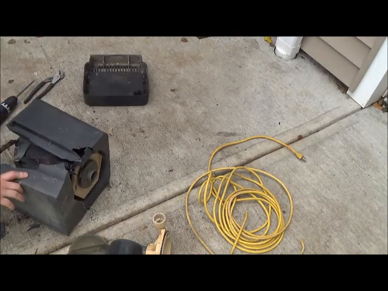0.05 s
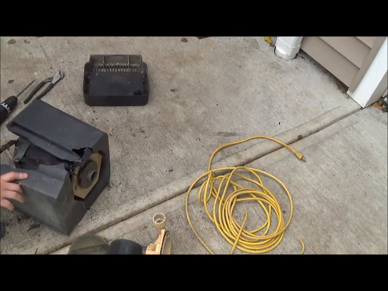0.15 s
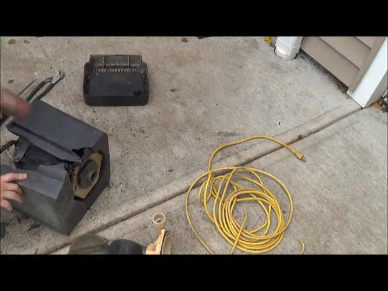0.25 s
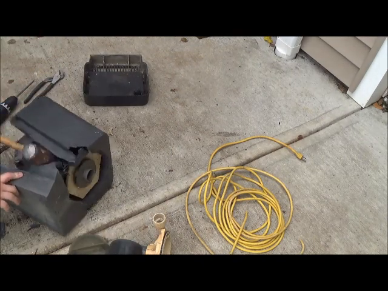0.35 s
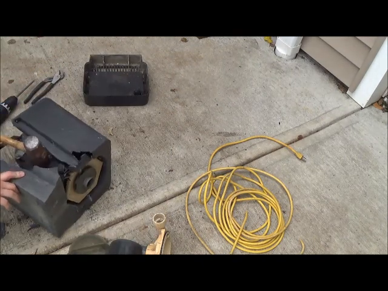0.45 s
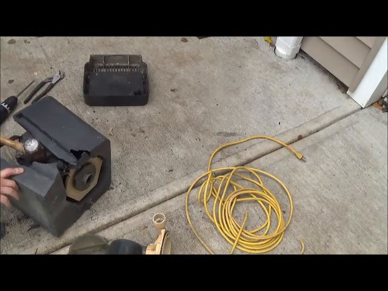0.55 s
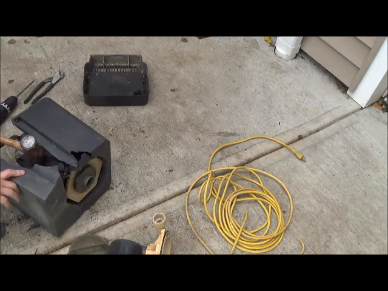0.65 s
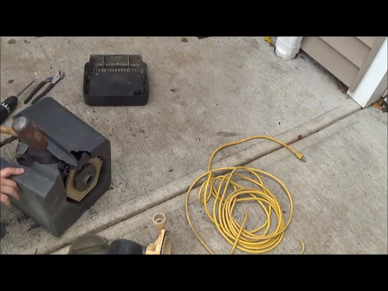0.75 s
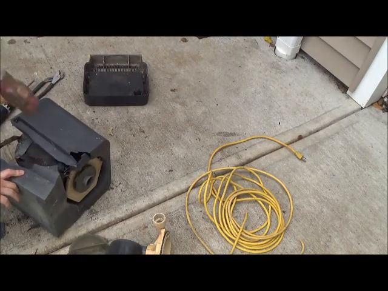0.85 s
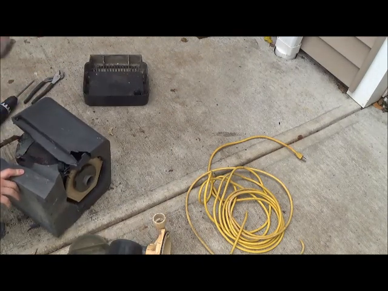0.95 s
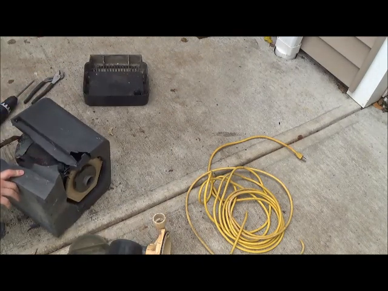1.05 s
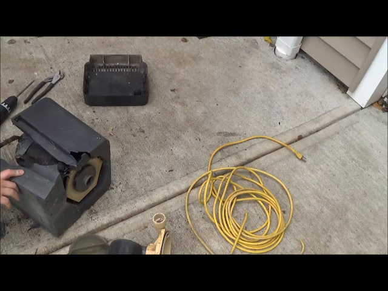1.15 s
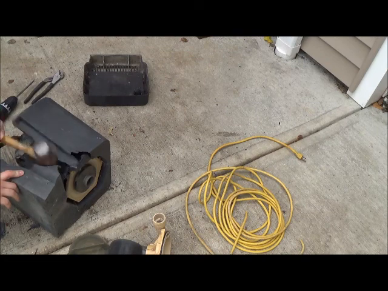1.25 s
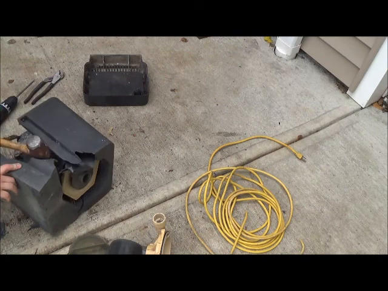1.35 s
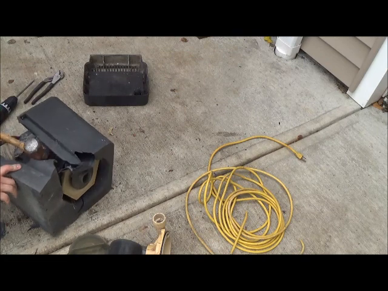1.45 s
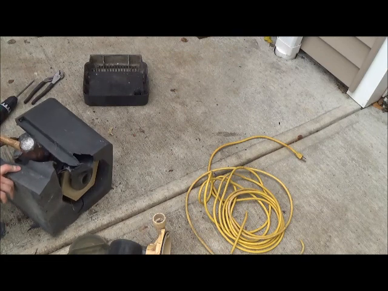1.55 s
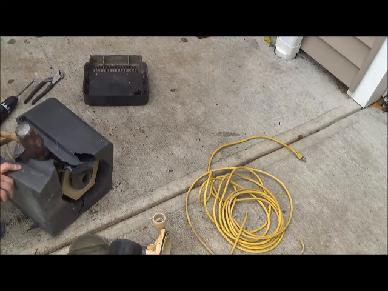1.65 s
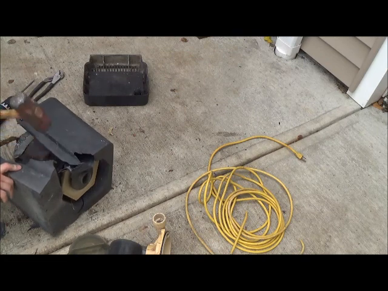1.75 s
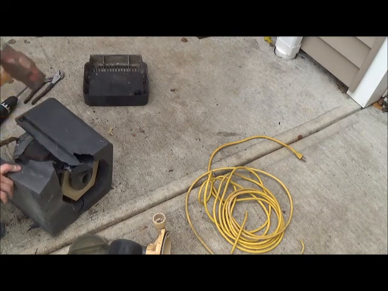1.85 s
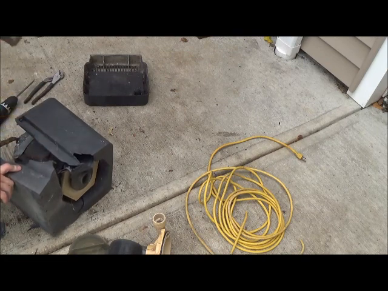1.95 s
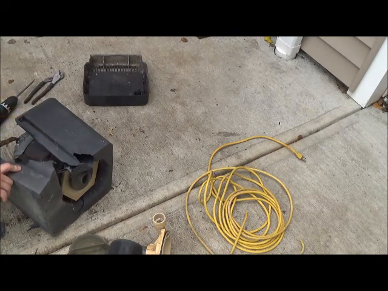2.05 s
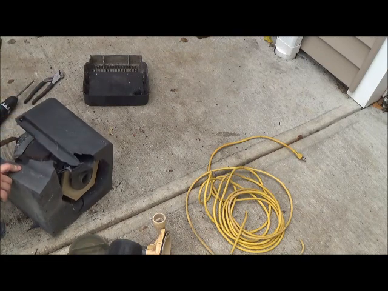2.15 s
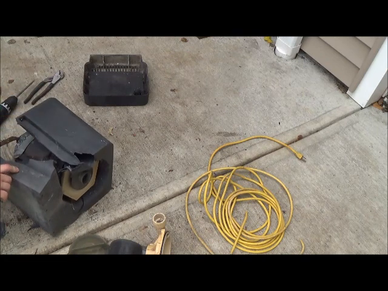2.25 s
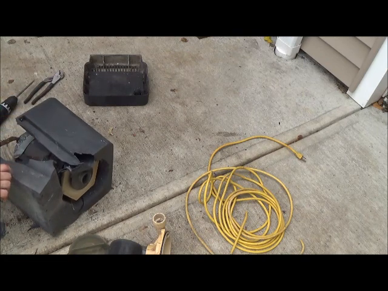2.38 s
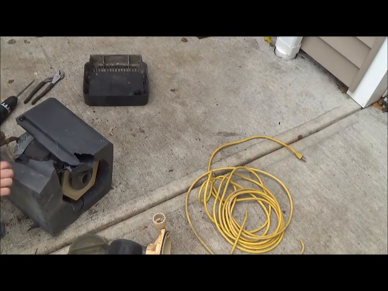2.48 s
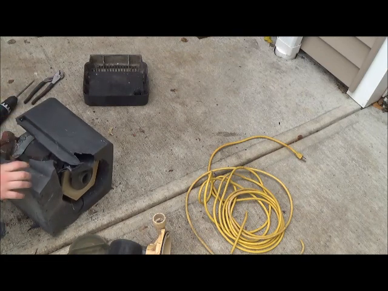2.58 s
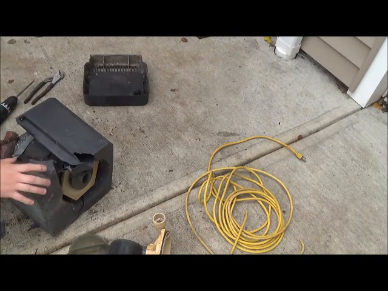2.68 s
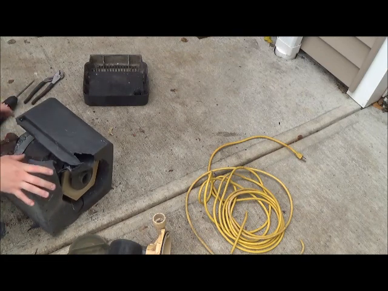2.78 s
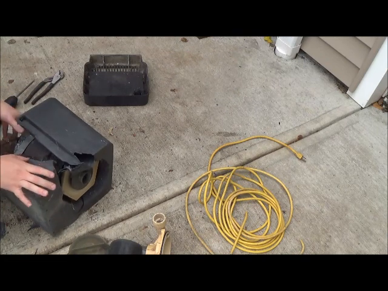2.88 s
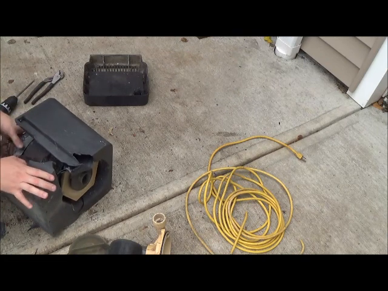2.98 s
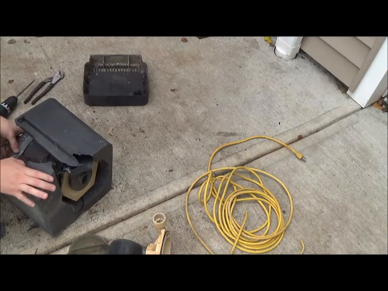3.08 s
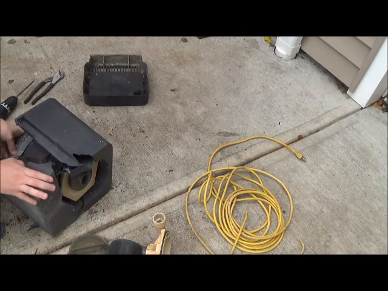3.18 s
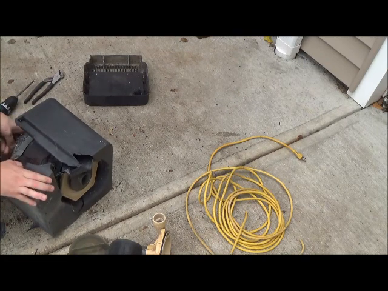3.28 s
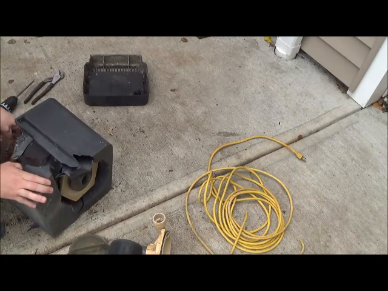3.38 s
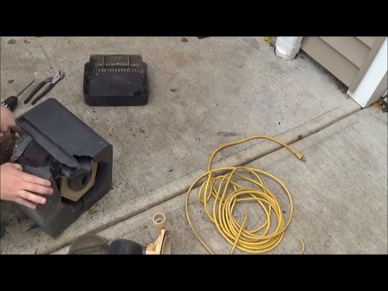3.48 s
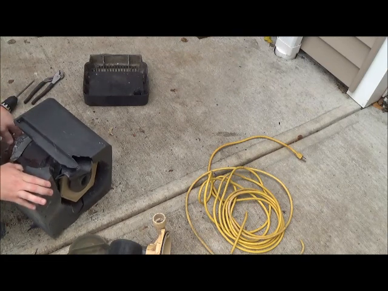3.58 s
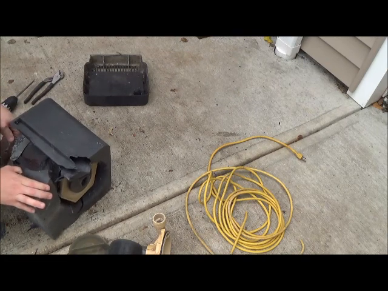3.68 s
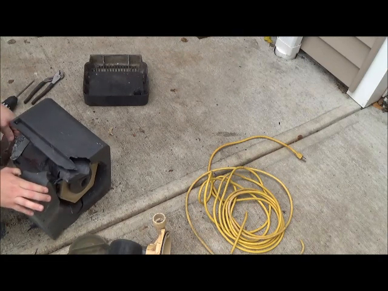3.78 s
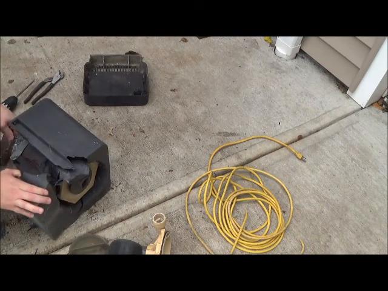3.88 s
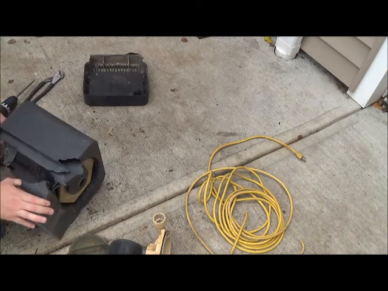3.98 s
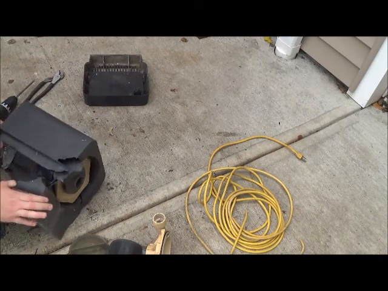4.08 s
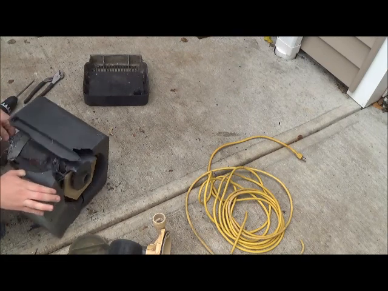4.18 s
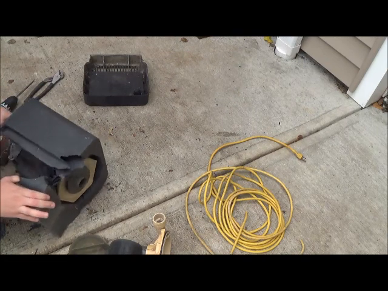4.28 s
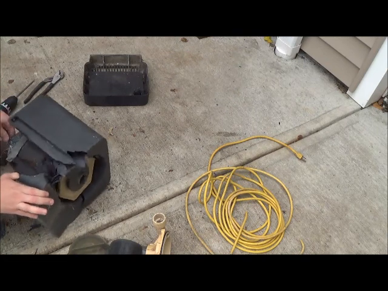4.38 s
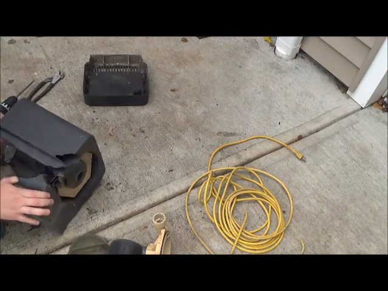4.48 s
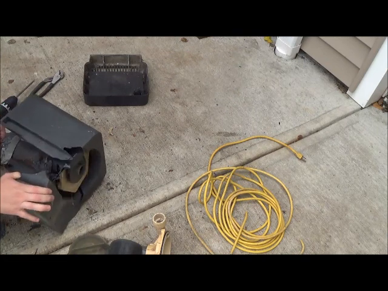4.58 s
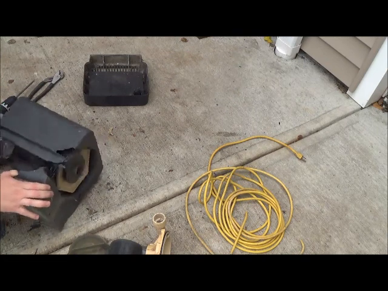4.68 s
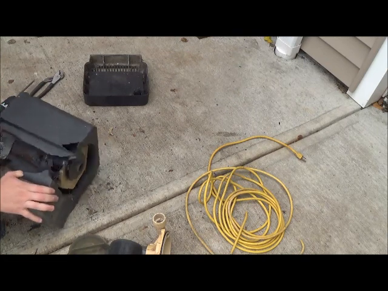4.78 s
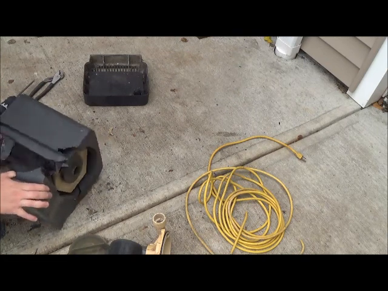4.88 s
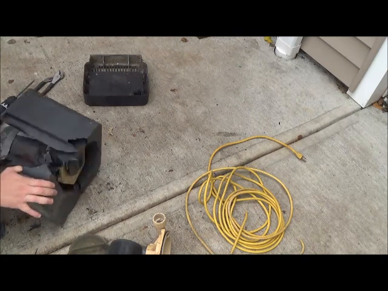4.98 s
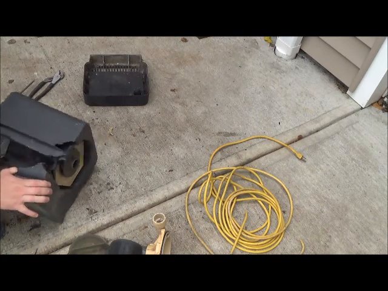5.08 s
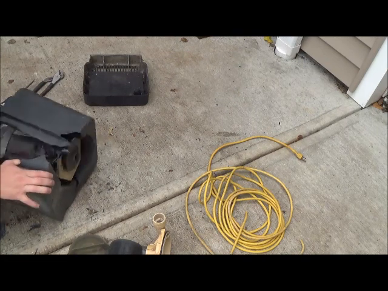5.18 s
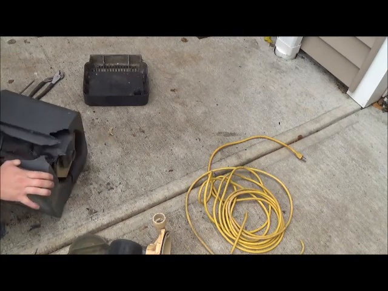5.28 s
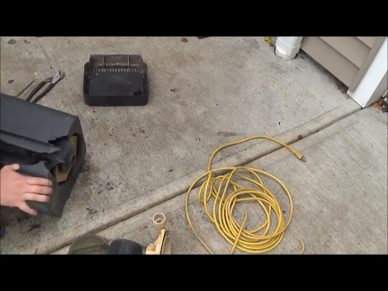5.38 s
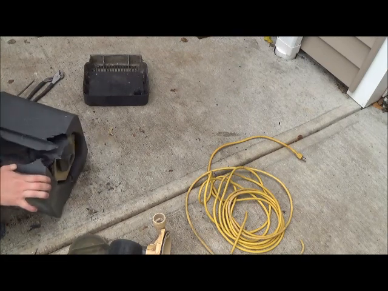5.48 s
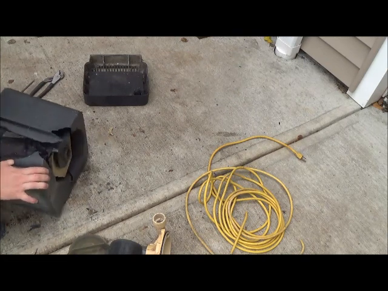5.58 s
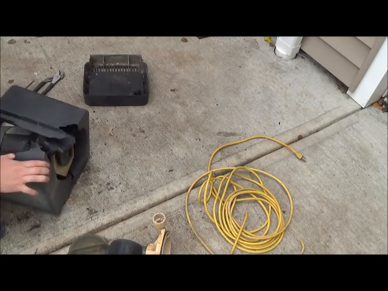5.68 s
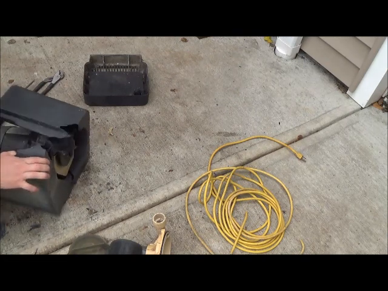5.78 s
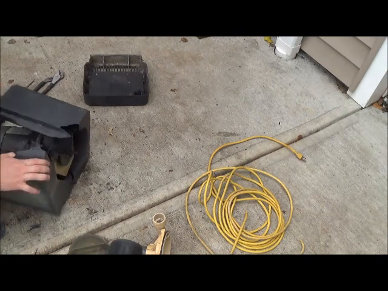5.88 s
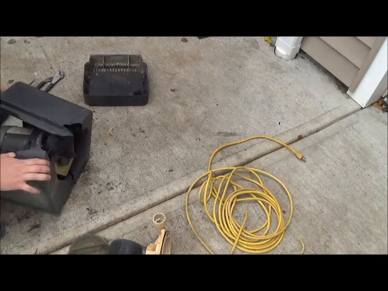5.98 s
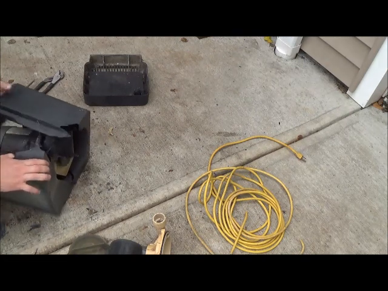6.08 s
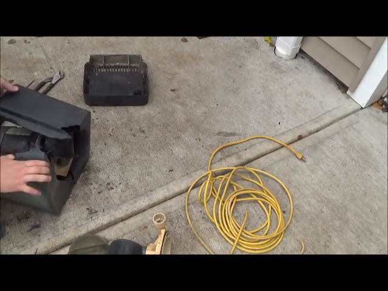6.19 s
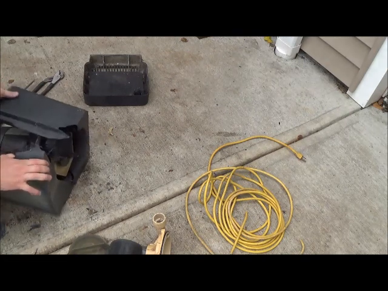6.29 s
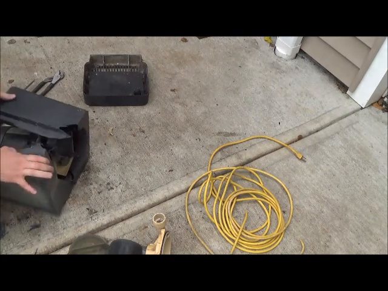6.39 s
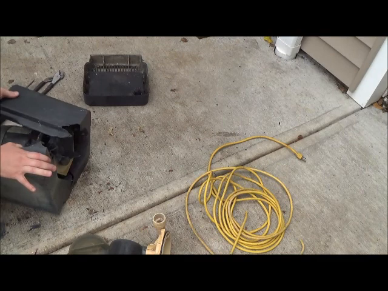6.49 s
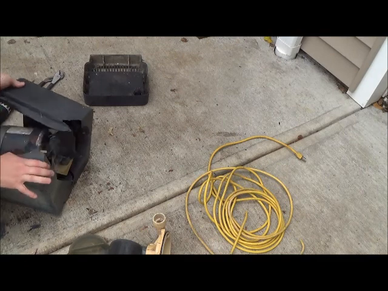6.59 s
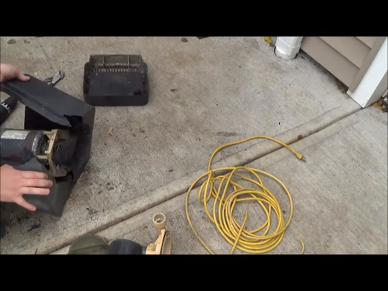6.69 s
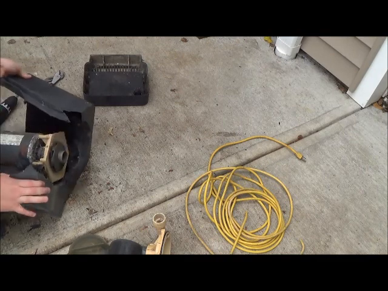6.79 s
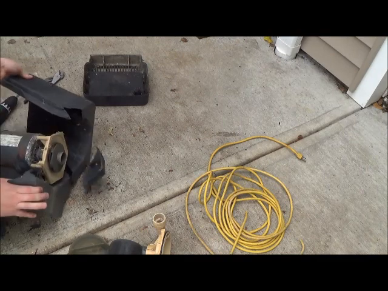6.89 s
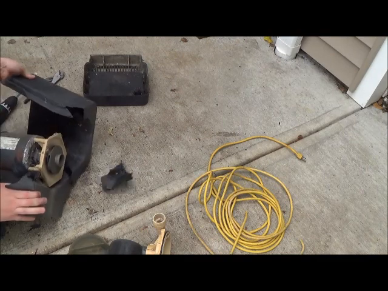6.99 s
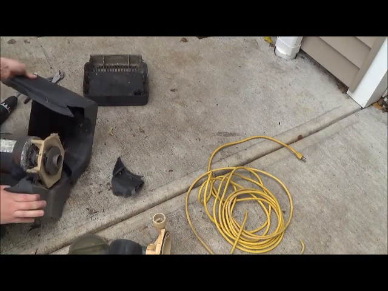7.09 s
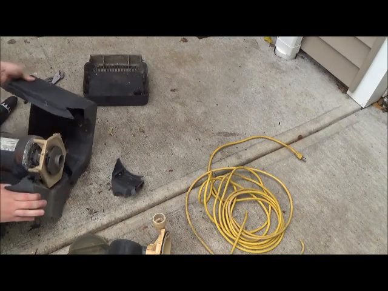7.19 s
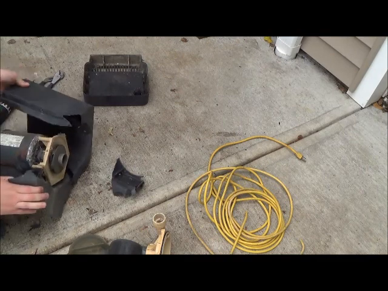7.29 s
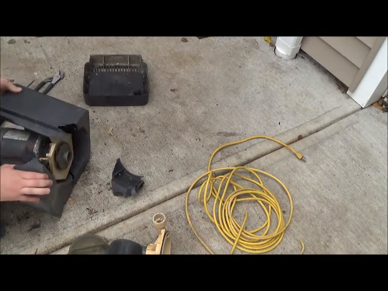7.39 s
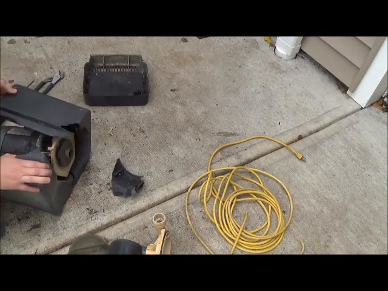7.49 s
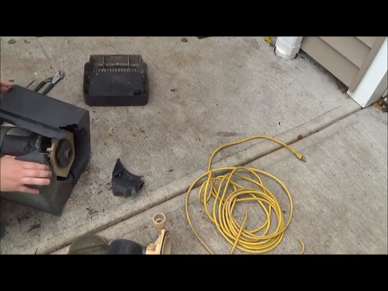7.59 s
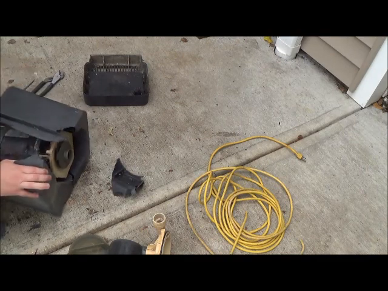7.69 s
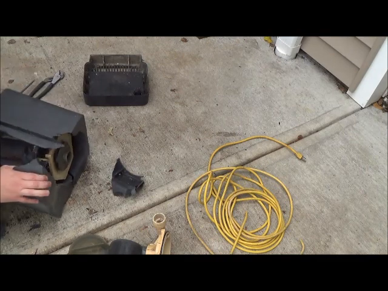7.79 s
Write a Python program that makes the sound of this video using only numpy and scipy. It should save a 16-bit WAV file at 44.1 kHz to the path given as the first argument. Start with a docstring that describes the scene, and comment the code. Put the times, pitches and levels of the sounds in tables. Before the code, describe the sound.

Soft outdoor air and distant murmur run beneath everything, beside a house wall. A brief grainy swish at 0.3 s precedes a hard hammer blow at 0.4 s: splintering plastic, hollow boom and knocking rattle that fade by about 1 s. A second blow at 1.35 s cracks and rattles more briefly, then near quiet. At 2.65 s the heavy motor thumps inside; around 2.96 s the steel hammer head clinks on concrete with small cracks. Prying starts in earnest at 3.7 s, with sharp fractures near 4.0 and 4.15 s, a heavy knock at 4.43 s, and dense grinding, hollow knocks, brittle snaps and short squeaks until 5.5 s. It subsides to light rattling around 6-6.5 s. From 6.8 s the side tears away, with very loud cracks at 6.9 and 7.05 s, then lesser snaps and knocks around 7.15 and 7.5 s before fading. Close microphone, loud peaks flattened, faint short wall reflections.

```python
"""Outdoor air murmurs beside a house wall; a swish, then a hammer lands twice on a cracked plastic pump housing.
Each blow splinters the plastic, and the shell rattles and knocks on the concrete drive around its heavy motor.
Hands then grip and pry the shell: stick-slip grinds it, the hammer head clinks down, and torn edges crackle,
snap and squeak until a side breaks away. Noise bursts and slips drive the resonances of each part.
A fast limiter in the close two-port microphone flattens the loudest cracks."""
import sys
import numpy as np
from scipy import signal
from scipy.fft import rfft, irfft
from scipy.io import wavfile
from scipy.ndimage import uniform_filter1d

SR = 44100
rng = np.random.default_rng(int(sys.argv[2]) if len(sys.argv) > 2 else 0)


def wav_record(signal):
    """Record a signal, one row per channel, as 16-bit PCM in the file named by sys.argv[1]."""
    frames = np.transpose(np.atleast_2d(signal))
    bounded = np.clip(frames, -1, 1)
    # unit amplitude maps onto the largest positive 16-bit level
    quanta = np.round(bounded * 32767).astype(np.int16)
    wavfile.write(sys.argv[1], SR, quanta)


N = 346185
TIME = np.arange(N) / SR
OPEN_S = 6.8   # the side breaks away: knocks and grinding now ring the modes of the loose panels instead of the box modes (the fractures ring the loose panels throughout)

# hammer blows: start_s, level_db (relative), splintering_t60_s
BLOWS = [(0.3952, -6.5, 0.48), (1.3425, -5.5, 0.47)]
# fractures, longer cracks and scuffs of the plastic: start_s, level_db (relative), t60_s
BREAKS = [(2.966, -19, 0.15), (3.015, -24, 0.12), (3.182, -37, 0.13), (3.6852, -5.5, 0.069),
          (3.85, -15, 0.082), (3.999, -9, 0.03), (4.015, 4.5, 0.078), (4.1505, 3, 0.074),
          (6.601, -17.5, 0.11), (6.811, -9, 0.12), (6.9145, 12, 0.17), (7.059, 3.5, 0.15),
          (7.1551, -7.5, 0.054), (7.4639, -5, 0.064)]
# the shell knocks on the motor and the ground: start_s, level_db (relative), contact_pitch_hz
KNOCKS = [(0.444, 4, 690), (0.586, 5.5, 905), (0.7, -8.5, 1460), (0.792, -7.5, 1910), (0.995, -30.5, 1300),
          (1.448, 0, 750), (1.56, -17, 1860), (1.657, -24, 544), (2.653, -19, 468), (2.699, -13.5, 850),
          (2.944, -20, 484), (3.81, -12, 342), (3.918, 10, 660), (3.939, -4.5, 920), (4.07, -8.5, 343),
          (4.239, -9, 750), (4.349, -5, 790), (4.429, 12.5, 563), (4.645, -10.5, 1050), (4.693, -5, 346),
          (4.803, 4.5, 900), (5.049, 8.5, 1100), (5.166, -1.5, 970), (5.276, -3, 1050), (5.47, -10, 1500),
          (5.565, -12.5, 1460), (5.582, -9.5, 364), (5.663, -11, 1210), (5.717, -9.5, 760),
          (5.75, -11, 700), (5.808, -0.5, 910), (5.902, -15.5, 910), (5.954, -6, 840), (6.142, -13.5, 1140),
          (6.212, -18.5, 760), (6.614, -14, 322), (6.642, -11.5, 1070), (6.724, -17, 1830),
          (6.749, -10, 1520), (6.879, 0.5, 570), (6.929, 11, 770), (7.418, -18.5, 694), (7.465, -6.5, 1400),
          (7.516, -5.5, 666)]
# hands grip and force the shell: start_s, effort_db, crackle_db (both relative)
PRYING = [(2.75, -52, -68), (2.89, -42, -47), (3.09, -39.5, -55), (3.32, -45.5, -49), (3.72, -39.5, -49.5),
          (3.86, -36, -40), (4.04, -17.5, -24), (4.24, -25.5, -32.5), (4.3, -19.5, -24), (4.42, -5, -21),
          (4.57, -22, -26.5), (4.76, -14, -26), (4.87, -16, -25), (4.95, -9, -21.5), (5.18, -19, -24),
          (5.27, -17, -29), (5.38, -18.5, -27), (5.62, -32, -38), (5.85, -25, -39), (6.21, -36.5, -40.5),
          (6.4, -37, -43), (6.55, -39, -42.5)]
# box modes of the hollow shell: pitch_hz, width_hz, level_db (against the broad response, hands off)
SHELL_MODES = [(156, 15, 3), (349.6, 19.5, 5.5), (440, 11, -0.5), (549, 19, -11), (651, 73, -8),
               (731.6, 19, 2), (944, 39, -2), (1043, 42, 7), (1126, 91, -1), (1490, 14, -9),
               (1560, 130, -11)]


def from_db(db):
    """Decibels to gain."""
    return np.exp(np.asarray(db) * (np.log(10) / 20))


def rms_one(x):
    """Scale to unit rms."""
    return x / np.sqrt(np.mean(x ** 2) + 1e-20)


def gain_curve(rows, axis=1):
    """One dB column of a curve as a gain, silent outside its span."""
    rows = np.array(rows)
    return from_db(np.interp(TIME, rows[:, 0], rows[:, axis], left=-200, right=-200))


def drift(rate):
    """Slow chance of rms 1, turning at rate points per second."""
    knots = rng.standard_normal(int(N / SR * rate) + 2)
    return rms_one(np.interp(TIME * rate, np.arange(len(knots)), knots))


def fade(t60, length):
    """A decay of 60 dB in t60 seconds, lasting length seconds."""
    return from_db(-60 * TIME[:int(length * SR)] / max(t60, .002))


def add(track, s, sound):
    """Mix a sound in at time s."""
    at = max(round(s * SR), 0)
    track[at:at + len(sound)] += sound[:N - at]


def response(spectrum, size=4096):
    """Causal, minimum-phase impulse response of unit energy with the given spectrum."""
    hz, db = np.transpose(spectrum)
    grid = np.maximum(np.arange(size // 2 + 1) * SR / size, 1)
    spectrum_db = np.interp(np.log(grid), np.log(hz), db)
    cepstrum = irfft(np.log(from_db(spectrum_db)))
    # folding the cepstrum forward makes the response causal
    cepstrum[1:size // 2] *= 2
    cepstrum[size // 2 + 1:] = 0
    return rms_one(irfft(np.exp(rfft(cepstrum)))) / np.sqrt(size)


def through(x, impulse):
    """Pass a signal through an impulse response."""
    return signal.oaconvolve(x, impulse)[:len(x)]


def resonate(x, hz, width_hz):
    """One resonance with gain 1 on top."""
    hz = min(hz, .45 * SR)
    b, a = signal.iirpeak(hz, hz / min(width_hz, .4 * SR), fs=SR)
    return signal.lfilter(b, a, x + 1e-18)


def unit_hit(sound):
    """Scale a hit by the strength of its first 8 milliseconds."""
    return sound / np.sqrt(np.mean(sound[:int(.008 * SR)] ** 2))


def slips(per_s, spread_db):
    """Random clicks of very uneven size, as surfaces slip on each other; rms 1."""
    draws = rng.random((int(per_s * N / SR) + 1, 3))
    sizes = from_db(spread_db * np.minimum(-np.log(1 - draws[:, 1]), 4))
    clicks = np.zeros(N)
    clicks[(draws[:, 0] * N).astype(int)] = sizes * np.sign(draws[:, 2] - .5)
    return rms_one(clicks)


def outdoor_air(level_db, side_db, waver_db):
    """Distant neighbourhood murmur of wind and traffic, with a thin hiss on top: coloured noise."""
    # frequency_hz, density_db (per Hz, relative)
    air_colour = [(15, -57), (25, -31), (76, -1.5), (200, -7), (229, -6), (416, -4.5), (463, -8), (624, -4),
                  (863, -4), (1020, -5.5), (1840, -15.5), (2280, -22), (3340, -23), (13200, -29),
                  (16000, -33.5)]
    mid, side = (through(rng.standard_normal(N), response(air_colour)) for _ in range(2))
    level = from_db(level_db + waver_db * drift(14))
    return level * (mid + from_db(side_db) * side * [[1], [-1]])


def brush():
    """A soft, slightly grainy swish during the first swing: dense slips through a colour."""
    # start_s, level_db
    brush_level = [(0, -50), (.23, -55.5), (.29, -35.5), (.39, -39), (.45, -80)]
    # frequency_hz, density_db (per Hz, relative)
    brush_colour = [(1200, -2), (2100, 6), (2750, 7), (3100, 4), (3800, -2), (4500, 6), (5000, 4),
                    (5800, -5), (11000, -11), (16000, -49)]
    grain = slips(per_s=12000, spread_db=2.5)
    return gain_curve(brush_level) * through(grain, response(brush_colour))


def shell_response(box_modes):
    """The damped plastic answers broadly, with a few box modes standing out."""
    # frequency_hz, density_db (per Hz, relative)
    shell_colour = [(40, -45), (110, -15.5), (165, -6.5), (220, -6.5), (330, 0), (420, -1.5), (750, -1),
                    (1100, -5.5), (1700, -0.5), (2600, -5), (4500, -10), (9000, -7), (16000, -14)]
    broad = response(shell_colour)
    modes = sum(from_db(db) * resonate(broad, hz, width) for hz, width, db in box_modes)
    return rms_one(broad + modes) / np.sqrt(len(broad))


def contact(t60, first):
    """One hard touch followed by dense dying chatter."""
    force = rng.standard_normal(int(.4 * SR)) * fade(t60, .4)
    force[0] = first
    return force


def fractures(rows, shell, shell_db):
    """Fractures, longer cracks and scuffs of the plastic, or the splintering of a blow: a dense burst of
    splinters that also shakes the shell."""
    # frequency_hz, density_db (per Hz, relative)
    fracture_colour = [(100, -34), (300, -18), (600, -4), (1500, 2), (2200, -0.5), (3300, 3.5), (4400, -2),
                       (5600, -1.5), (7200, -2), (9500, 3), (12000, 1), (16000, -33)]
    force = np.zeros(N)
    for s, db, t60 in rows:
        add(force, s, from_db(db) * contact(t60, first=5.9))
    force *= from_db(2.8 * drift(300))
    splinters = through(force, response(fracture_colour))
    return splinters + from_db(shell_db) * through(force, shell)


def wandering(pitches, per_s, spread_db, width_share, wander_db):
    """Slips at many contact points, each with its own pitch and coming and going on its own; rms 1."""
    total = np.zeros(N)
    for hz in pitches:
        point = resonate(slips(per_s, spread_db), hz, width_share * hz)
        total += point * from_db(wander_db * drift(40))
    return rms_one(total)


def grinding(effort, crackle, shell, open_shell, shudder_db, rasp_db, crackle_db):
    """Stick-slip jolts shake the shell and rasp its panels while grit and torn edges crackle in clumps."""
    # frequency_hz, density_db (per Hz, relative)
    grit_colour = [(300, -56), (1500, -6.5), (3300, 7.5), (5500, 1), (7200, 1), (9500, 9.5), (12000, 4.5),
                   (16000, -9.5)]
    jolts = wandering(np.geomspace(240, 720, 4), per_s=600, spread_db=1.5, width_share=0.79, wander_db=3.0)
    rasp = wandering(np.geomspace(820, 2500, 7), per_s=300, spread_db=1.5, width_share=.2, wander_db=7.0)
    grit = wandering(np.geomspace(3000, 14800, 16), per_s=330, spread_db=1.2, width_share=0.061, wander_db=4.0)
    force = effort * (from_db(shudder_db) * jolts + from_db(rasp_db) * rasp)
    shudder = through(force * (TIME < OPEN_S), shell) + through(force * (TIME >= OPEN_S), open_shell)
    clumps = from_db(crackle_db + 2.0 * drift(70))
    return shudder + clumps * through(crackle * grit, response(grit_colour))


def rattles(open_shell):
    """A rattle builds fast, sags while the hammer bears on the shell, then dies; the wall booms as its blow set it."""
    # after each blow, as the hammer bounces back and as the shell settles: start_s, level_db (relative), hold_s
    rattle_rows = [(0.395, -4.5, 0.2), (0.713, -16.5, 0.11), (1.343, -4, 0.094), (1.655, -41, 0.045),
                   (1.761, -36, 0.031)]
    # boom of the big side wall, one row per blow: pitch_hz, width_hz, level_db (against the broad response)
    wall_booms = [(346, 14, 11.5), (386, 23, -14)]
    attack_s, sag_db_per_s, release_db_per_s = 0.018, 39, 162
    crackle_sag_db_per_s = 24   # the crackle dies this much faster than the body
    out = np.zeros(N)
    for s, db, hold in rattle_rows:
        age = np.maximum(TIME - s, 0)
        fall_db = sag_db_per_s * age + release_db_per_s * np.maximum(age - hold, 0)
        shake = np.minimum(age / attack_s, 1) * from_db(db - fall_db)
        crackle = shake * from_db(-crackle_sag_db_per_s * age)
        nearest_blow = np.argmin([abs(s - row[0]) for row in BLOWS])
        shell = shell_response([*SHELL_MODES, wall_booms[nearest_blow]])
        out += grinding(shake, crackle, shell, open_shell, shudder_db=-12, rasp_db=-10.5, crackle_db=-11.5)
    return out


def knocks(rows, closed_shell, open_shell):
    """Each knock drives the shell most strongly around the pitch that its hardness sets."""
    out = np.zeros(N)
    for s, db, hz in rows:
        shell = closed_shell if s < OPEN_S else open_shell
        force = resonate(contact(t60=0.11, first=5.1), hz, width_hz=hz)
        add(out, s, from_db(db - 8) * unit_hit(through(force, shell)))
    return out


def snaps(rows):
    """Small cracks: a sharp tick, and a brief ring of the splinter at its own pitch."""
    # frequency_hz, density_db (per Hz, relative)
    crack_colour = [(100, -70), (300, -28), (600, -4), (1500, 2.5), (3500, -3), (5500, -4), (7200, -2),
                    (9500, 2.5), (12000, 2), (16000, -17.5)]
    out, edge = np.zeros(N), response(crack_colour)
    for s, db, hz in rows:
        t60 = 0.044 * (9000 / hz) ** .25   # higher splinters die sooner
        force = contact(t60, first=5.5)
        splinter = 3.7 * resonate(force, hz, 0.022 * hz) + resonate(force, hz, 1.56 * hz)
        add(out, s, from_db(db - 8.5) * unit_hit(through(splinter + 0.67 * force, edge)))
    return out


def torn_edges():
    """Brittle snaps of the torn edges, each a tick and a splinter's ring."""
    # start_s, level_db (relative), pitch_hz
    edge_snaps = [(0.474, 0, 10100), (0.6785, -18, 9700), (0.841, -15.5, 3400), (0.9183, -25, 2570),
                  (1.353, 4.5, 10500), (1.476, -5, 10200), (1.6627, -22, 10200), (1.6814, -22, 9300),
                  (1.93, -35.5, 10500), (2.6529, -30.5, 4320), (2.9547, -1, 3550), (2.9663, -0.5, 3400),
                  (3.3163, -22, 9100), (3.675, 3, 12200), (3.6944, 1.5, 8400), (3.7982, -17, 5700),
                  (3.835, -13.5, 4570), (4.298, -17, 9600), (4.3916, -1.5, 8800), (4.5418, 0.5, 9240),
                  (4.6109, -10.5, 9850), (4.6949, -7.5, 2480), (4.803, -4, 9200), (4.8901, 8, 2580),
                  (5.0643, 2.5, 10100), (5.243, 7.5, 2520), (5.2984, -11, 8560), (5.3746, -8.5, 8900),
                  (5.4184, -21, 8870), (5.4672, 0, 8200), (5.75, -16, 2860), (6.3723, -22, 6360),
                  (6.4377, -15, 11400), (6.6008, -9, 10340), (6.7, -10.5, 9600), (6.8563, -3, 9800),
                  (7.0223, 8, 3380), (7.157, -9, 9500), (7.186, -17, 10500), (7.2002, -8, 10000),
                  (7.2148, -8.5, 3040), (7.4096, -23, 8950)]
    return snaps(edge_snaps)


def creaks(wobble, overtone_db):
    """Torn edges squeak: fast stick-slip locks on to an unsteady pitch for a moment."""
    # start_s, length_s, pitch_hz, level_db (of the fundamental, relative)
    creak_rows = [(0.578, 0.032, 1690, -9.5), (0.735, 0.018, 1840, -20), (0.766, 0.057, 1983, -16),
                  (2.653, 0.0092, 2027, -21.5), (4.542, 0.059, 1505, -8.5), (4.728, 0.051, 1462, -13.5),
                  (4.806, 0.022, 1676, -13.5), (5.174, 0.024, 970, -29), (5.239, 0.027, 1610, -3.5),
                  (6.735, 0.045, 1874, -23)]
    out = np.zeros(N)
    for s, length, hz, db in creak_rows:
        t = TIME[:int(max(length, .005) * SR)]
        unsteady = rms_one(uniform_filter1d(rng.standard_normal(len(t)), size=40))
        phase = 2 * np.pi * np.cumsum(hz * (1 + wobble * unsteady)) / SR
        swell = np.sqrt(np.abs(np.sin(np.pi * t / t[-1])))
        tone = np.sin(phase) + from_db(overtone_db) * np.sin(2 * phase)
        add(out, s, from_db(db) * swell * tone)
    return out


def struck(touches, modes, level_db):
    """Every touch sets the modes of a solid part ringing, each with a strength of its own."""
    out = np.zeros(N)
    for s, touch_db in touches:
        for hz, db, t60 in modes:
            ring = fade(t60, .4) * rng.choice([-1, 1])
            strength = from_db(touch_db + db + level_db + rng.normal(0, 1.0))
            add(out, s, strength * ring * np.sin(2 * np.pi * hz * TIME[:len(ring)]))
    # a small body radiates no deep bass
    return signal.sosfilt(signal.butter(2, 90, "high", fs=SR, output="sos"), out + 1e-18)


def motor_thumps():
    """The heavy motor bumps inside the shell and rings on its mounts."""
    # start_s, level_db (relative)
    thumps = [(0.622, -17), (2.65, -19.5), (2.697, -8.5), (2.812, -22.5), (2.854, -28.5), (2.916, -28),
              (3.807, -31), (4.333, -15.5), (4.719, -20), (4.991, -17), (5.086, -15), (6.156, -25.5),
              (7.517, -30)]
    # pitch_hz, level_db (relative), t60_s
    motor_modes = [(80, -12, 0.089), (122, -19.5, 0.38), (171, 0, 0.077), (218, -18, 0.064),
                   (286, -3.5, 0.12), (489, 2.5, 0.063), (716, 5.5, 0.033), (780, -2, 0.15)]
    return struck(thumps, motor_modes, level_db=-3.5)


def stick_slip():
    """Gain of the grinding: it stalls before every knock or fracture, surges after it, and comes in clumps."""
    stick_s, stick_db, slide_s, slide_db = .028, -5, 0.058, 2
    since = TIME - np.array([*KNOCKS, *BREAKS])[:, :1]
    stuck = ((since < 0) & (since > -stick_s)).any(axis=0)
    sliding = ((since >= 0) & (since < slide_s)).any(axis=0)
    clumps_db = 2 * drift(22)
    gain_db = stick_db * stuck + slide_db * sliding + clumps_db
    return from_db(uniform_filter1d(gain_db, size=300))


def strays(gain, per_s, above_db, range_hz):
    """Random small events whose strength follows the given gain: rows of start_s, level_db, pitch_hz."""
    start, end = PRYING[0][0], TIME[-1]
    draws = rng.random((int(per_s * (end - start)), 3))
    s = start + (end - start) * draws[:, 0]
    spread_db = 9 * (2 * draws[:, 1] - 1)
    db = 20 * np.log10(np.interp(s, TIME, gain)) + above_db + spread_db
    low, high = range_hz
    return list(zip(s, db, low * (high / low) ** draws[:, 2]))


def handwork(shell, open_shell):
    """Prying and peeling grind the shell; the harder the pull, the stronger its stray knocks and snaps."""
    # the hands peel the side away: start_s, effort_db, crackle_db (both relative)
    peeling = [(6.55, -33, -44), (6.66, -26.5, -27.5), (6.784, -25.5, -35.5), (6.852, -25.5, -21),
               (7.008, -31, -34), (7.066, -28, -26), (7.202, -53, -42), (7.348, -45.5, -47),
               (7.518, -36, -37), (7.664, -45.5, -53), (7.83, -52, -58)]
    effort = gain_curve(PRYING, axis=1) + gain_curve(peeling, axis=1)
    crackle = gain_curve(PRYING, axis=2) + gain_curve(peeling, axis=2)
    jerk = stick_slip()
    grind = grinding(effort * jerk, crackle * jerk ** 0.52, shell, open_shell,
                     shudder_db=-10.5, rasp_db=-8.5, crackle_db=0)
    stray_knocks = strays(effort, per_s=6, above_db=10.5, range_hz=(346, 1510))
    stray_snaps = strays(crackle, per_s=11, above_db=11, range_hz=(7150, 11500))
    return grind + knocks(stray_knocks, shell, open_shell) + snaps(stray_snaps)


def hammer_clinks():
    """The hammer head is laid on the concrete and rocks, ringing its steel modes."""
    # start_s, level_db (relative)
    clinks = [(2.9647, -1), (3.0584, -13), (3.0874, -28), (3.1238, -22)]
    # pitch_hz, level_db (relative), t60_s
    head_modes = [(1620, -12, 0.031), (1925, 4, 0.043), (2230, -11, 0.05), (3350, -6, 0.039),
                  (3410, -4, 0.033)]
    return struck(clinks, head_modes, level_db=-8.0)


def near_echoes(x):
    """A few distinct first echoes off the concrete and the kneeling body, shared by both ports."""
    # delay_s, level_db
    echo_rows = [(0.0014, -28.5), (0.00285, -28), (0.0058, -28)]
    out = np.zeros(N)
    for delay, db in echo_rows:
        add(out, delay, from_db(db) * x)
    return out


def reflections(x, delay, t60, mid_db, side_db):
    """Scattered echoes, partly shared by the two microphone ports and partly opposed."""
    decay = fade(t60, .7)
    decay[:int(delay * SR)] = 0
    decay /= np.sqrt(np.sum(decay ** 2))
    mid, side = (through(x, decay * rng.standard_normal(len(decay))) for _ in range(2))
    return from_db(mid_db) * mid + from_db(side_db) * side * [[1], [-1]]


def surroundings(work):
    """Ground, body and house wall scatter the sound back, the wall later and longer."""
    # frequency_hz, density_db (per Hz, relative)
    scatter_colour = [(60, -6.5), (160, 1), (320, 3), (700, 3.5), (1500, 1), (3000, 2.5), (5500, 3.5),
                      (9000, -1.5), (13000, -11.5), (20000, -35)]
    scattered = through(work, response(scatter_colour))
    near = reflections(scattered, delay=0.00136, t60=0.067, mid_db=-20, side_db=-16.0)
    wall = reflections(scattered, delay=0.0095, t60=0.39, mid_db=-20, side_db=-25.5)
    return near_echoes(scattered) + near + wall


def scene():
    """The housing sits a little to the left; its surroundings throw its sound back into the outdoor air."""
    # modes of the loose panels: pitch_hz, width_hz, level_db (against the broad response)
    open_modes = [(201, 18, 1), (484, 13, -17), (522, 14, 7.5), (586, 30, 5.5), (691, 28, 8.5),
                  (880, 51, 2), (1100, 39, 14)]
    shell, open_shell = shell_response(SHELL_MODES), shell_response(open_modes)
    # the gripping hands mute the box modes by 1.5 dB
    held_shell = shell_response([(hz, width, db - 1.5) for hz, width, db in SHELL_MODES])
    work = brush()
    work += fractures(BLOWS, shell, shell_db=-6) + rattles(open_shell)
    work += knocks(KNOCKS, shell, open_shell) + torn_edges()
    work += creaks(wobble=0.079, overtone_db=-12.5) + motor_thumps()
    work += handwork(held_shell, open_shell) + hammer_clinks()
    work += fractures(BREAKS, open_shell, shell_db=-18)
    placed = (work + surroundings(work)) * from_db([[.6], [-.6]])
    return placed + outdoor_air(level_db=-41, side_db=-11.0, waver_db=1.7)


def limiter(x, ceiling_db, release_db_per_s, attack_s):
    """The gain drops within a millisecond, so the first spike slips through, and recovers at a steady dB rate."""
    over = np.maximum(20 * np.log10(np.abs(x).max(axis=0) + 1e-9) - ceiling_db, 0)
    release_db = release_db_per_s * TIME
    held = np.maximum.accumulate(over + release_db) - release_db
    keep = np.exp(-1 / (attack_s * SR))
    return x * from_db(-signal.lfilter([1 - keep], [1, -keep], held))


def record(dry):
    """The microphone's limiter, rounding of the spikes that pass it, then the top is cut above 15.9 kHz."""
    limited = limiter(dry, ceiling_db=-2.5, release_db_per_s=443, attack_s=0.000067)
    rounded = limited / (1 + np.abs(limited / .84) ** 6) ** (1 / 6)
    return signal.sosfilt(signal.ellip(10, .1, 80, 15900, fs=SR, output="sos"), rounded)


dry = scene()
out = record(dry)
wav_record(out)
```